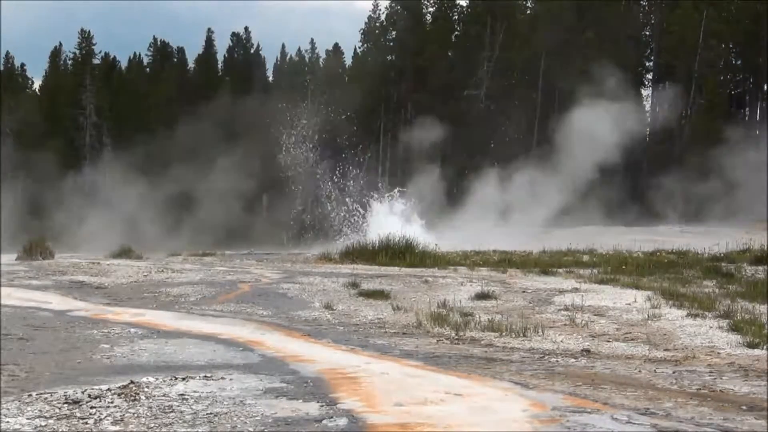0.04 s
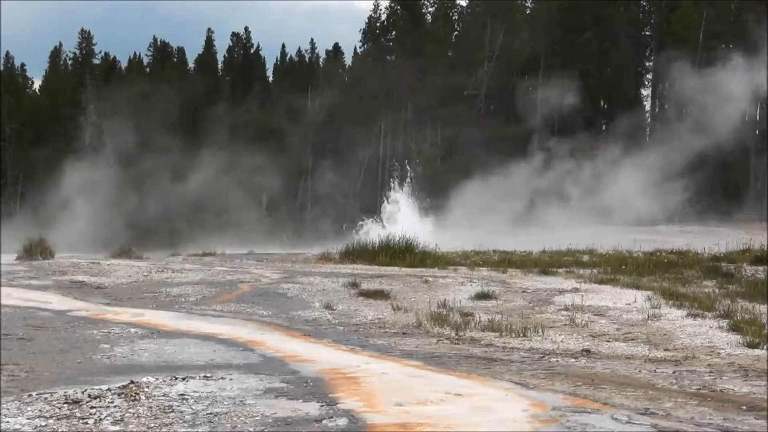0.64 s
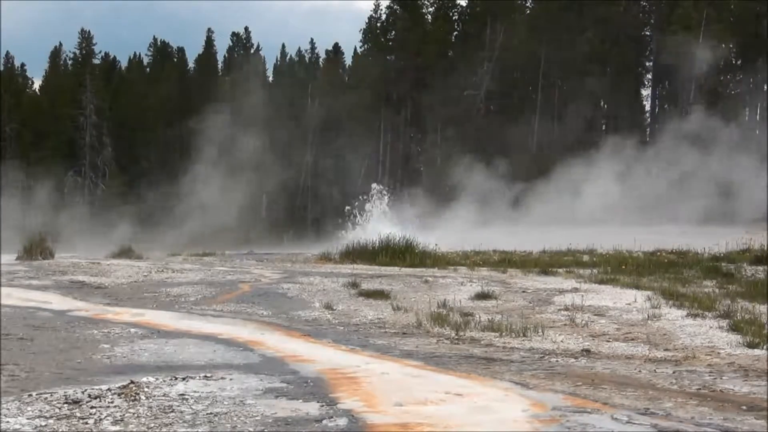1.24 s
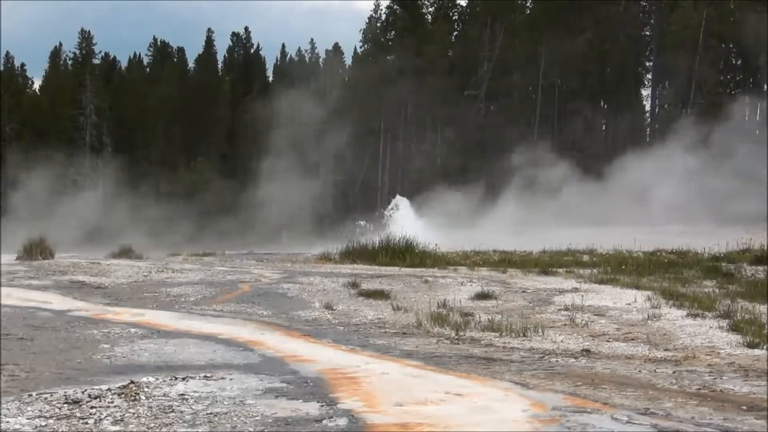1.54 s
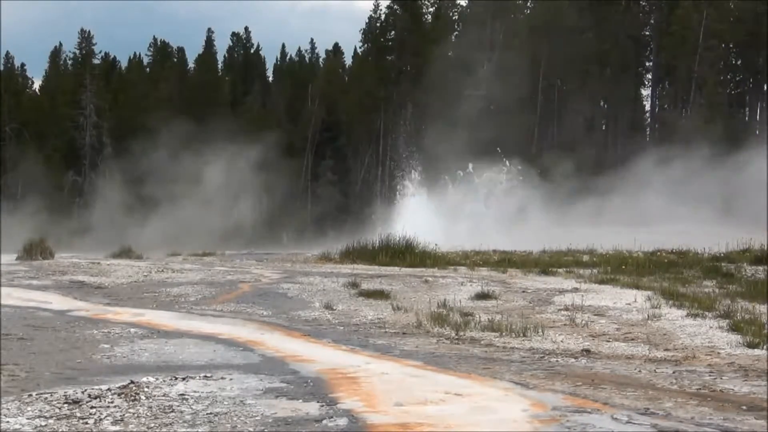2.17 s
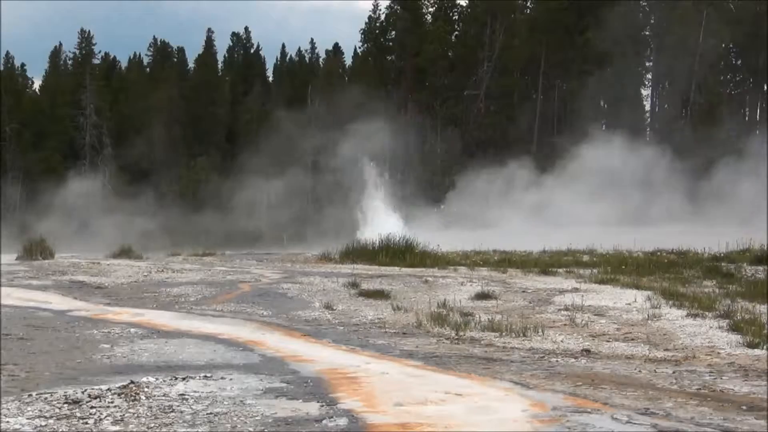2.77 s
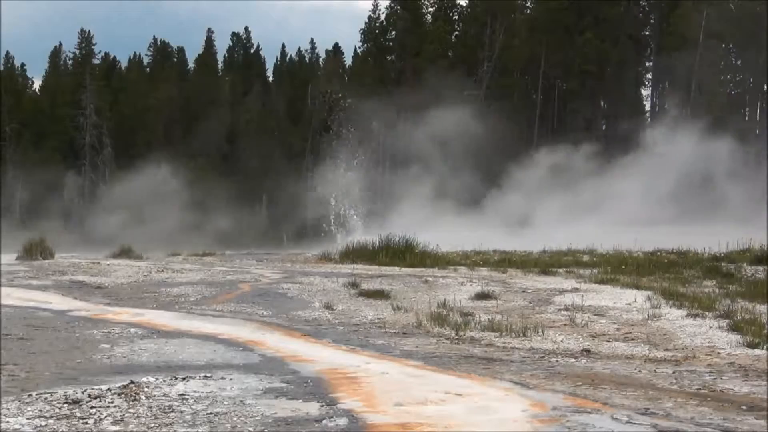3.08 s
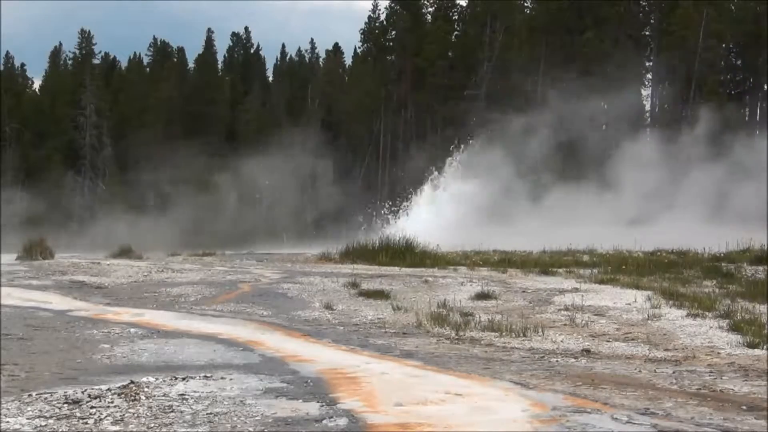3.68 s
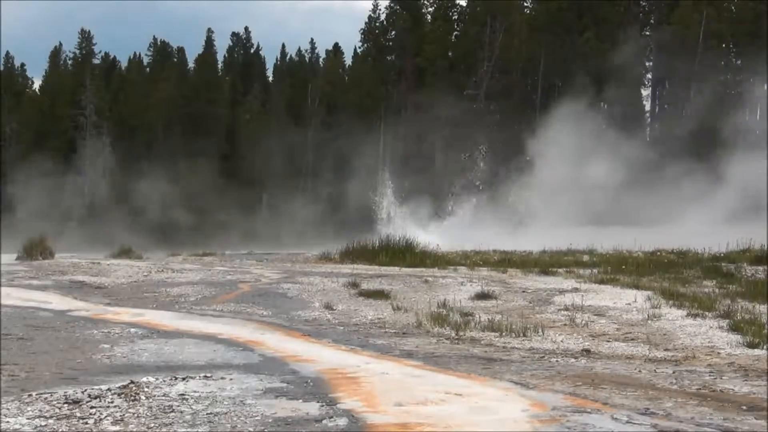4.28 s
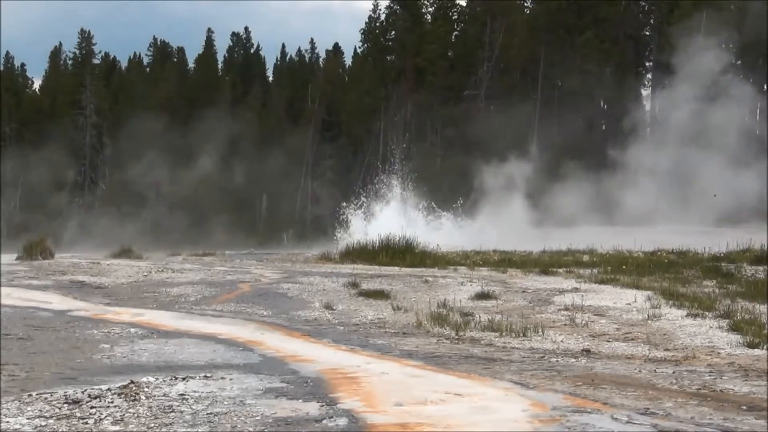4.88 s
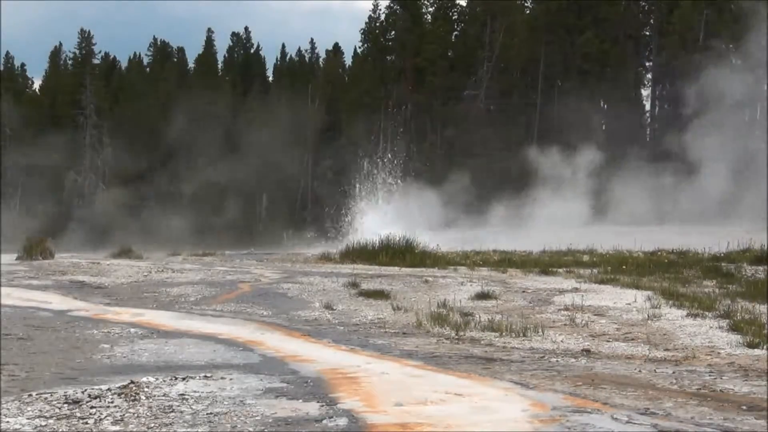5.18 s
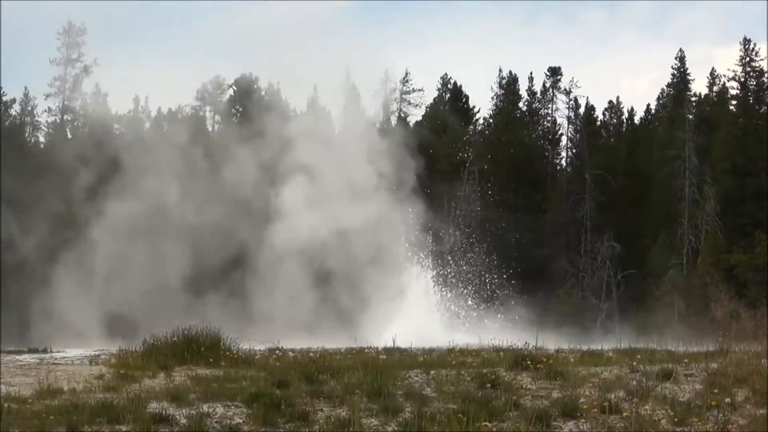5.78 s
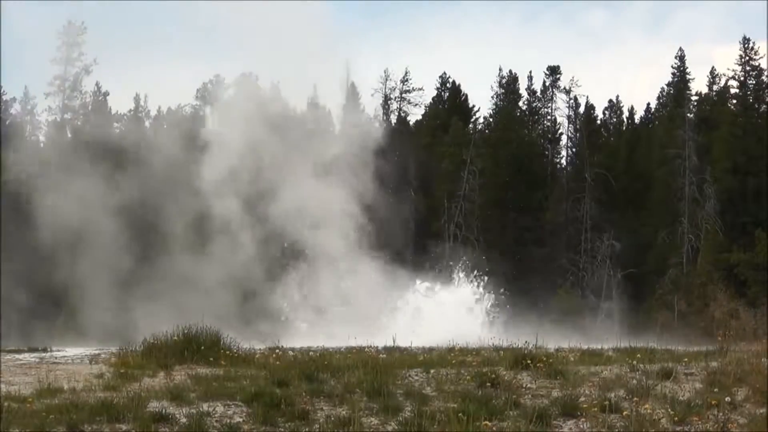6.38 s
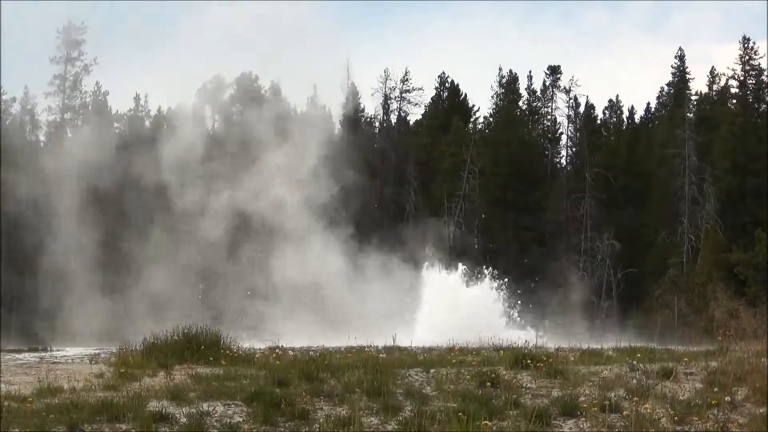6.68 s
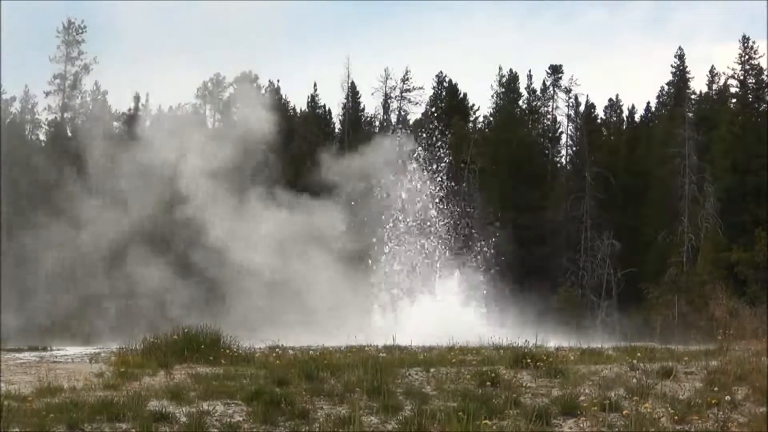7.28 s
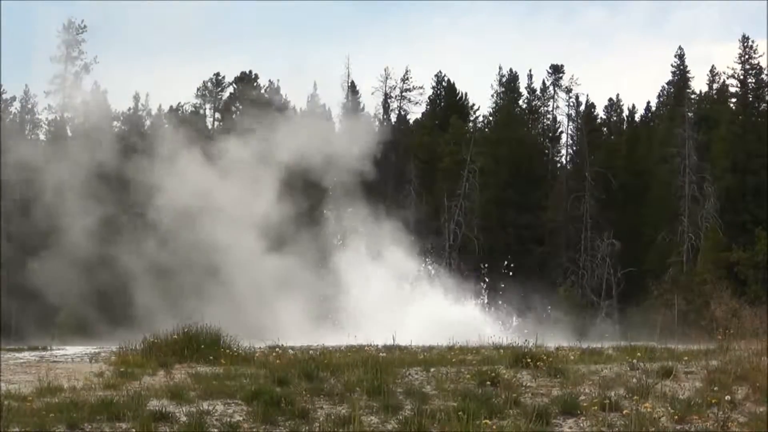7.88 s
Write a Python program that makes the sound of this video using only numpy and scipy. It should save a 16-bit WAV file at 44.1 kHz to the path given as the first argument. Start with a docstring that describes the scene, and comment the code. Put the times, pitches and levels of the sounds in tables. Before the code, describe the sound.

Close to the microphone, a geyser pool gurgles and splashes, its rushing water dotted with plopping bubbles and heavy drops. It builds briefly, then subsides to a moment of silence a little past halfway. From a more distant outdoor position, a faint wavering roar and a fine spray hiss fade in and slowly grow. Steam thumps dully in the vent now and then in both parts.

```python
"""A small geyser erupts outdoors, heard in stereo from the edge of its pool. Close to the microphone
the water churns, bubbles ring in short plops and falling drops land with sharp spats, while steam
thumps dully in the vent. The pool fades to silence after about five seconds. Then the geyser fades
in from farther off, a soft, growing roar under a thin hiss of spray, with the vent still thumping."""
import sys
import numpy as np
from scipy import signal
from scipy.fft import rfft, irfft, next_fast_len
from scipy.io import wavfile

SR = 44100
rng = np.random.default_rng(int(sys.argv[2]) if len(sys.argv) > 2 else 0)


def file_out(sig):
    """Save sig as 16-bit WAV at sys.argv[1]."""
    # one column per channel
    cols = np.atleast_2d(sig).T
    # limit, then scale
    lim = np.clip(cols, -1, 1)
    pcm = np.round(lim * 32767).astype(np.int16)
    wavfile.write(sys.argv[1], SR, pcm)


N = 354123
TIME = np.arange(N) / SR
POOL_END_S, DISTANT_START_S = 5.215, 5.277


def from_db(db):
    """Decibels to gain."""
    return 10 ** (np.asarray(db) / 20)


def rms_one(x):
    """Scale to rms 1."""
    return x / np.sqrt(np.mean(x ** 2) + 1e-20)


def colour(x, curve):
    """Filter by a smooth curve of (Hz, dB) points."""
    size = next_fast_len(N + 4096)
    hz, db = np.transpose(curve)
    bins = np.fft.rfftfreq(size, 1 / SR)
    gain = from_db(np.interp(np.log(bins + 1), np.log(hz), db))
    return irfft(rfft(x, size) * gain, size)[:N]


def drift(rate_hz, step=40):
    """A slow random wander with a spread of 1."""
    pole = np.exp(-2 * np.pi * step * rate_hz / SR)
    noise = rng.standard_normal(N // step + 2002)
    slow = signal.lfilter([1], [1, -2 * pole, pole * pole], noise)[2000:]
    return np.interp(np.arange(N) / step, np.arange(len(slow)), rms_one(slow))


def resonate(x, hz, q):
    """A broad resonance with gain 1 at its peak."""
    w = 2 * np.pi * min(hz, SR * 7 / 16) / SR
    damp = np.sin(w) / (2 * q)
    return signal.lfilter([damp, 0, -damp], [1 + damp, -2 * np.cos(w), 1 - damp], x + 1e-18)


def add(out, s, sound):
    """Mix a sound in at s seconds."""
    at = int(np.clip(s * SR, 0, N - 1))
    out[at:at + len(sound)] += sound[:N - at]


def outdoors(x, width, pan, count=8):
    """Faint scattered echoes reach the microphone; the bass stays centred, higher bands lean aside."""
    delays = (rng.uniform(.002, .04, count) * SR).astype(int)
    echoes = sum(np.pad(x, (d, 0))[:N] * (-1) ** k for k, d in enumerate(delays)) / np.sqrt(count)
    side = colour(echoes, width)
    channels = []
    for sign in (1, -1):
        lean = [(hz, sign * (db - pan[0][1]) / 2) for hz, db in pan]
        channels.append(colour(x + sign * side, lean))
    return np.array(channels)


def rush(spectrum, flutter_db, flutter_hz):
    """Countless merged splashes: noise whose octave bands swell and sink on their own."""
    bands = [resonate(rng.standard_normal(N), hz, q=1) * from_db(flutter_db * drift(flutter_hz))
             for hz in 50 * 2 ** np.arange(8)]
    return rms_one(colour(sum(bands), spectrum))


# One surge at the pool's edge. Each row: time in seconds, splashing and churning levels in relative dB.
SURGE_LEVELS = [(0.0, -40.5, -47.4), (1.1, -37.0, -47.5), (1.75, -36.5, -43.5), (2.5, -34, -44.0),
                (2.7, -36.5, -46.3), (3.5, -38.5, -48.5), (3.95, -43, -52.9), (4.5, -51.5, -61.0),
                (4.95, -60, -71.5)]
def surge_db(s):
    """The pool swells and subsides: levels of the splashing and of the churning at s seconds."""
    times, *levels = np.transpose(SURGE_LEVELS)
    return [np.interp(s, times, db) for db in levels]


# Churning water, close up. Each row: frequency in Hz, spectral level in relative dB.
CHURN_SPECTRUM = [(25, -18.5), (60, -21.5), (100, -13), (180, -3.5), (350, 2), (600, 1), (1000, 0),
                  (1700, -3), (3000, -11.5), (6000, -40.5)]
def churning():
    """Water tumbles in the pool with a fluttering, mid-pitched rush."""
    return rush(CHURN_SPECTRUM, flutter_db=2.07, flutter_hz=19)


def bubble(hz, decay_s, glide=.13, onset=.4):
    """A bubble pinches off, rings a few cycles and rises in pitch as it nears the surface."""
    age = np.arange(int(6 * decay_s * SR) + 8) / SR / decay_s   # in decay times
    swell = (1 - np.exp(-(age / onset) ** 2)) * np.exp(-age)
    return swell / swell.max() * np.sin(2 * np.pi * hz * decay_s * (age + glide * age ** 2 / 2))


def bubbling(per_s, pitch_hz, pitch_spread, size_db, cycles, count=9000):
    """Bubbles of one family of sizes are born at random times in the pool."""
    out = np.zeros(N)
    births = np.cumsum(rng.exponential(1, count)) / per_s
    traits = np.clip(rng.standard_normal((count, 3)), -2.5, 1.9)
    for s, (pitch, size, ring) in zip(births[births < POOL_END_S], traits):
        hz = pitch_hz * np.exp(pitch_spread * pitch)
        add(out, s, from_db(size_db * size) * bubble(hz, cycles / hz * np.exp(.4 * ring)))
    return out / np.std(out[:int(POOL_END_S * SR)])


# Splashing water, close up. Each row: frequency in Hz, gain in relative dB.
SPLASH_SPECTRUM = [(500, -22.5), (1100, -11.5), (1800, -2.5), (2800, -2), (4500, -2.5), (7500, -4.5),
                   (8800, -2.5), (10500, -6.5), (12800, -11), (15800, -11)]
def fizzing():
    """The finest splashing blends into an even, bright noise."""
    return rms_one(colour(rng.standard_normal(N), SPLASH_SPECTRUM))


def spatter(per_s=2200, size_db=4.5, burst_s=.0015, clump_db=2.5, bands=12):
    """Small drops fall in clumps, each a tiny burst of fizz with its own size and brightness."""
    out = np.zeros(N)
    hit_chance = from_db(clump_db * drift(rate_hz=25)) * per_s / bands / SR
    for hz in np.geomspace(2200, 14000, bands):
        sizes = from_db(size_db * np.minimum(rng.exponential(1, N), 4.4))
        hits = sizes * (rng.random(N) < hit_chance)
        power = signal.lfilter([1], [1, -np.exp(-2 / (burst_s * SR))], hits ** 2 + 1e-18)
        out += resonate(np.sqrt(power) * rng.standard_normal(N), hz, q=3)
    return rms_one(colour(out, SPLASH_SPECTRUM))


def strays(per_s, above_db, spread_db, pitch_hz, pitch_spread, count=120):
    """Lesser plops or spats, unevenly spaced, that follow the splashing level: rows of (s, dB, Hz)."""
    jitter, size, pitch = rng.random((count, 3)).T
    s = (np.arange(count) + jitter) / per_s
    db = surge_db(s)[0] + above_db + spread_db * (2 * size - 1)
    hz = pitch_hz * np.exp(pitch_spread * (2 * pitch - 1))
    return np.column_stack([s, db, hz])[s < POOL_END_S]


# The loudest bubbles near the microphone.
# Each row: start in seconds, level in relative dB, nominal pitch in Hz, decay time in cycles.
LARGE_BUBBLES = [(0.0635, -25, 1550, 1.9), (0.096, -24.5, 1530, 3.2), (0.421, -32, 1080, 3.8),
                 (0.529, -25.5, 1810, 4), (0.6496, -22, 1890, 4.7), (0.713, -22, 1820, 4.5),
                 (0.758, -24.5, 2090, 5.6), (0.9851, -20, 1300, 3.4), (1.1732, -15.5, 1400, 0.78),
                 (1.362, -23, 1080, 2.5), (1.3833, -19.5, 1780, 3.5), (1.4647, -18.5, 1630, 4.4),
                 (1.519, -27.5, 1314, 7.5), (1.5502, -22, 1390, 2.4), (1.704, -20.5, 1600, 4.3),
                 (1.7554, -22.5, 1740, 4.6), (1.82, -18, 1870, 1.7), (1.8856, -24.5, 1280, 4.0),
                 (1.952, -15.5, 1590, 2.3), (2.038, -21, 1880, 4), (2.165, -22.5, 1880, 3.4),
                 (2.376, -19.5, 1400, 2.6), (2.435, -22.5, 2020, 2.6), (2.4489, -17.5, 1490, 2.3),
                 (2.486, -27, 1020, 3.8), (2.614, -13.5, 1520, 1.3), (2.6691, -24, 1450, 3.1),
                 (2.787, -23.5, 1450, 3.7), (3.087, -24.5, 1980, 3.8), (3.1114, -19, 1870, 2.6),
                 (3.6054, -18.5, 1630, 2.7), (3.9325, -25, 1850, 2.8), (4.022, -27, 1280, 4),
                 (4.1472, -32, 1650, 3.6), (4.337, -29.5, 1770, 2.5), (4.473, -32, 1760, 2.1),
                 (5.038, -47.5, 1270, 4.4)]
def plops(level_db=-1, start_ratio=.862, splash_db=-16, splash_s=.0025, stray_cycles=3.3):
    """Large bubbles start a little under pitch, throw up a small splash and bring two weaker bubbles."""
    out, age = np.zeros(N), TIME[:2048] / splash_s
    lesser = strays(per_s=9, above_db=11, spread_db=1.5, pitch_hz=1829, pitch_spread=.14)
    for s, db, hz, cycles in list(LARGE_BUBBLES) + [(*row, stray_cycles) for row in lesser]:
        plop = bubble(start_ratio * hz, cycles / hz, glide=.16, onset=.48)
        add(out, s, from_db(db + level_db) * plop)
        splash = rms_one(resonate(rng.standard_normal(len(age)), 1.2 * hz, q=.93))
        add(out, s - splash_s / 2, from_db(db + splash_db) * splash * age * np.exp(1 - age))
        for late, pitch in rng.uniform(0, 1, (2, 2)):
            companion = bubble(hz * (.8 + .6 * pitch), decay_s=.0012)
            add(out, s - .005 + .014 * late, from_db(db - 13.5) * companion)
    return out


# The loudest drops hitting the pool. Each row: start in seconds, level in relative dB, ring pitch in Hz.
HEAVY_DROPS = [(0.2115, -19, 10500), (0.3747, -29, 4800), (0.5205, -21, 8500), (1.033, -18.5, 4540),
               (1.2808, -16.5, 5650), (1.3294, -16, 4600), (1.5016, -21.5, 2880), (1.605, -19.5, 2610),
               (1.707, -18.5, 4590), (1.781, -15.5, 6160), (1.9632, -15.5, 6360), (2.2866, -18.5, 4200),
               (2.2994, -14.5, 3380), (2.4975, -15, 6360), (3.2211, -23, 10600), (3.2565, -20.5, 6600),
               (3.548, -19.5, 5900), (3.7071, -22.5, 4300), (4.0079, -20.5, 10100), (4.049, -21.5, 4300),
               (4.2946, -26.5, 5770), (4.5142, -32.5, 5340), (4.6598, -26.5, 6200), (4.906, -37, 9600)]
def spats(crack_db=1, crack_s=.0003, fizz_db=-14, fizz_s=.0018, ring_db=-4.5, cycles=5, top_hz=11000):
    """Heavy drops land with a sharp crack, a short fizz of droplets and the plink of trapped air."""
    out, age = np.zeros(N), TIME[:1024]
    crack = age / crack_s * np.exp(-age / crack_s)
    fizz = from_db(fizz_db) * age / fizz_s * np.exp(-age / fizz_s)
    lesser = strays(per_s=8, above_db=14, spread_db=4, pitch_hz=5860, pitch_spread=.6)
    for s, db, hz in [*HEAVY_DROPS, *lesser]:
        burst = resonate((crack + fizz) * rng.standard_normal(len(age)), hz, q=.9)
        add(out, s - crack_s, from_db(db + crack_db) * burst / np.abs(burst).max())
        add(out, s, from_db(db + ring_db) * bubble(hz, cycles / hz, glide=.025, onset=.34))
    return signal.sosfilt(signal.butter(2, top_hz, fs=SR, output="sos"), out)


# Stereo width at the pool's edge. Each row: frequency in Hz, side minus mid in dB.
NEAR_WIDTH = [(30, -27), (150, -47), (700, -21.5), (2000, -29.5), (10000, -20), (13000, -33.5)]
# Balance there. Each row: frequency in Hz, leftward lean in dB, with the first row taken as centre.
NEAR_BALANCE = [(750, 2), (1300, 0.7), (2300, -1), (9000, -1), (12000, 1.5)]
def pool(splash_db=2.5, churn_db=1.5, slosh_db=.5, low_cut_hz=450):
    """The pool from its edge: the harder the water falls, the more it gurgles, tinkles and spatters."""
    splash_gain, churn_gain = from_db(np.array(surge_db(TIME)) + slosh_db * drift(rate_hz=5))
    fizz = from_db(-10) * fizzing()
    gurgle = from_db(-9.5) * bubbling(per_s=520, pitch_hz=1599, pitch_spread=.2, size_db=6, cycles=2.8)
    tinkle = from_db(-8.5) * bubbling(per_s=800, pitch_hz=4205, pitch_spread=.42, size_db=5, cycles=3.2)
    splashing = gurgle + tinkle + from_db(-5) * spatter() + fizz
    surface = splash_gain * from_db(splash_db) * splashing + plops() + spats()
    # Small bubbles and drops radiate no bass.
    surface = signal.sosfilt(signal.butter(2, low_cut_hz, "high", fs=SR, output="sos"), surface)
    water = churn_gain * from_db(churn_db) * churning()
    return outdoors(water + surface, NEAR_WIDTH, NEAR_BALANCE)


# The strongest surges in the vent, heard dead centre from both positions.
# Each row: time of the peak in seconds, level in relative dB, centre frequency in Hz.
VENT_SURGES = [(1.63, -63, 85), (1.674, -39, 216), (2.34, -51, 150), (3.48, -57, 95), (5.565, -69, 472),
               (5.951, -71, 120), (6.051, -64, 452), (6.509, -60, 380), (7.631, -60, 170),
               (7.675, -53.5, 420), (7.93, -68, 95)]
def thumps(level_db=-2, swell_s=.034, q=.95):
    """Steam and water surge in the vent, each time with a brief swell of low rumble."""
    out, age = np.zeros(N), TIME[:SR // 2] - .25
    swell = np.exp(-(age / swell_s) ** 2)
    for s, db, hz in VENT_SURGES:
        rumble = resonate(resonate(rng.standard_normal(len(age)), hz, q), hz, q)
        thump = rms_one(rumble * swell) * np.sqrt(np.mean(swell ** 2))
        add(out, s + age[0], from_db(db + level_db) * thump)
    return out


def rise(final_db, db_per_s, fade_s=.4):
    """The distant sound fades in quickly, then grows steadily to the end."""
    fade_in = np.clip((TIME - DISTANT_START_S) / fade_s, 0, 1) ** .58
    return fade_in * from_db(final_db - db_per_s * (TIME[-1] - TIME))


# The gushing water from farther off. Each row: frequency in Hz, spectral level in relative dB.
ROAR_SPECTRUM = [(15, -60), (25, -32), (58, -30), (91, -17), (184, -7.5), (306, -4.5), (449, -1), (489, -2),
                 (543, -5.5), (763, -4.5), (924, -7), (1140, -5.5), (2730, -20), (4000, -27), (5200, -54),
                 (8800, -120)]
def roar(gush_db=.64):
    """At a distance the splashes merge into a soft, wavering roar."""
    gush = from_db(gush_db * drift(rate_hz=5))
    return rise(final_db=-56, db_per_s=4.5) * gush * rush(ROAR_SPECTRUM, flutter_db=1, flutter_hz=14)


# The spray from the same spot. Each row: frequency in Hz, spectral level in relative dB.
SPRAY_SPECTRUM = [(1500, -1), (3000, -1.5), (4500, 0.5), (7000, -1), (9000, -3), (11300, -3), (13000, -8),
                  (15500, -12)]
def spray():
    """The single drops merge into a thin, smooth hiss."""
    hiss = rms_one(colour(rng.standard_normal(N), SPRAY_SPECTRUM))
    return rise(final_db=-65.5, db_per_s=6.3) * hiss


# Stereo width at the far position. Each row: frequency in Hz, side minus mid in dB.
FAR_WIDTH = [(200, -45), (640, -18), (1400, -14), (3100, -9), (6800, -20), (14000, -34)]
# Balance there. Each row: frequency in Hz, left minus right in dB.
FAR_BALANCE = [(400, 0), (1300, -1.7), (2400, -1.5), (7000, 0)]
def distant_geyser():
    """With the microphone farther back, roar and spray arrive together among faint echoes."""
    return outdoors(roar() + spray(), FAR_WIDTH, FAR_BALANCE)


def scene(fade_s=.23):
    """The pool's edge, a moment of silence, then the geyser from farther off."""
    fade_out = np.clip((POOL_END_S - TIME) / fade_s, 0, 1) ** 1.12
    return fade_out * pool() + distant_geyser() + thumps()


def record(dry, cutoff_hz=15850):
    """The highest treble is cut off steeply."""
    return signal.sosfilt(signal.ellip(12, .1, 80, cutoff_hz, fs=SR, output="sos"), dry)


dry = scene()
out = record(dry)
file_out(out)
```